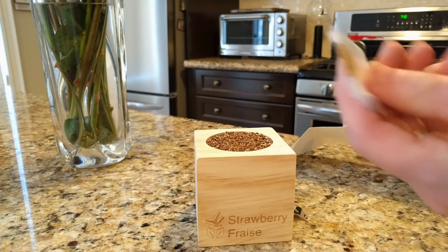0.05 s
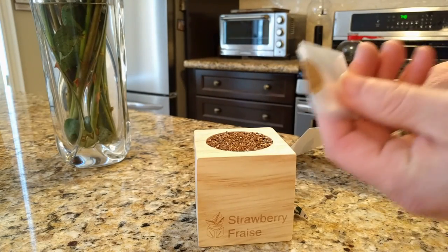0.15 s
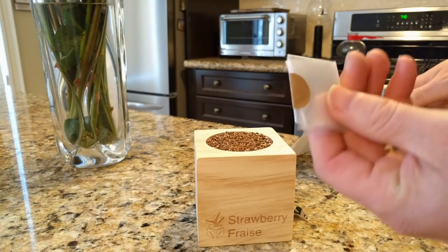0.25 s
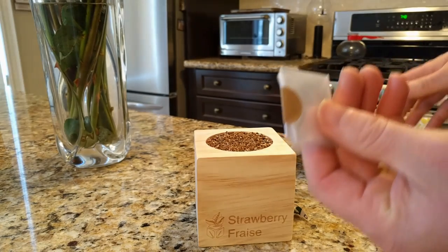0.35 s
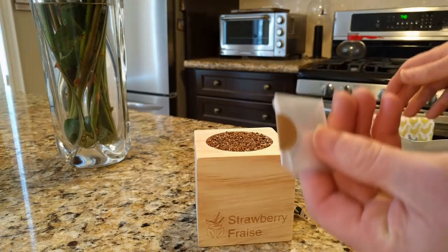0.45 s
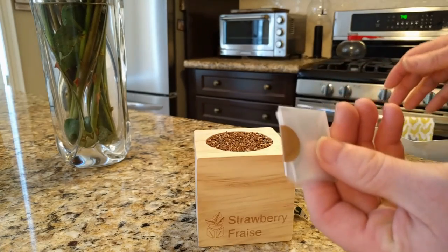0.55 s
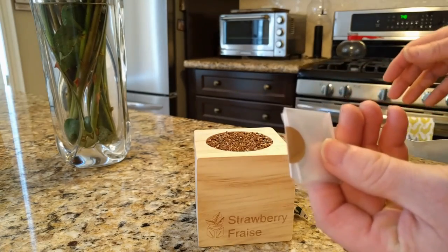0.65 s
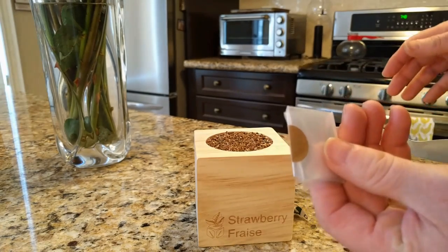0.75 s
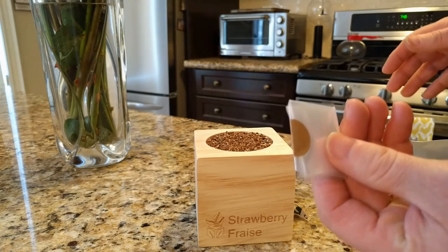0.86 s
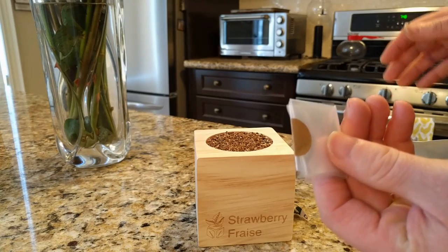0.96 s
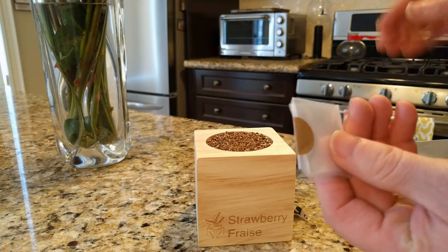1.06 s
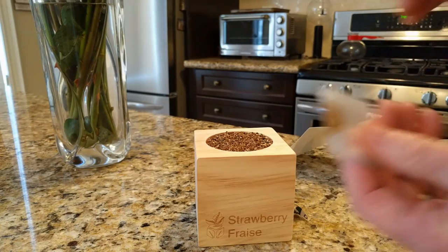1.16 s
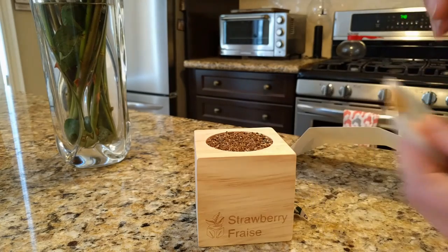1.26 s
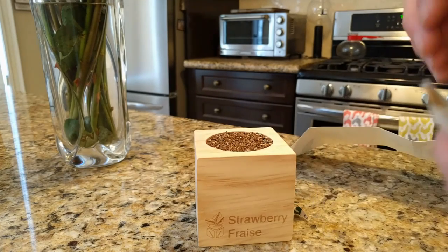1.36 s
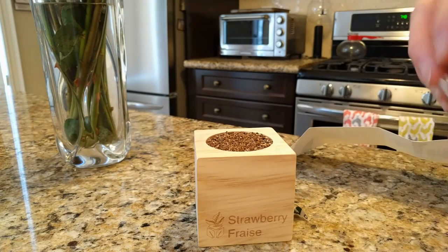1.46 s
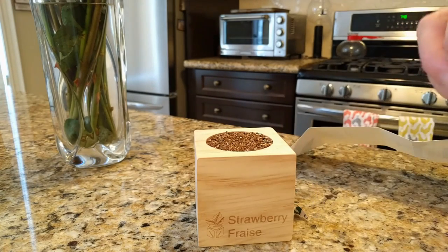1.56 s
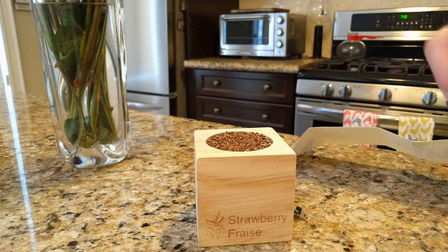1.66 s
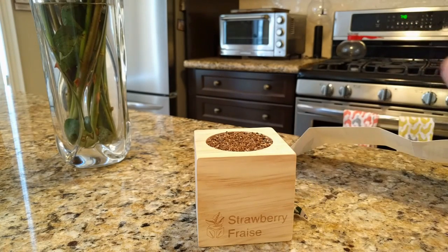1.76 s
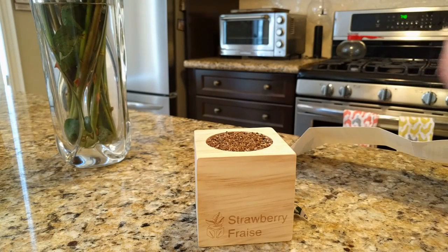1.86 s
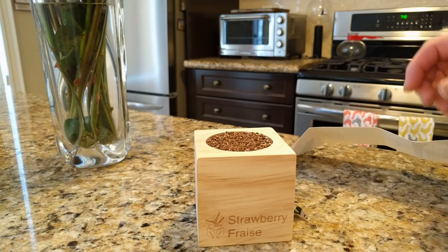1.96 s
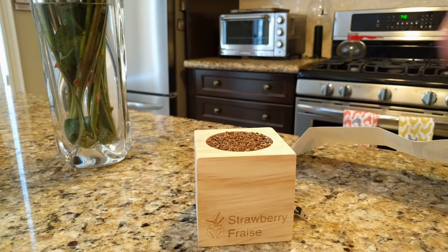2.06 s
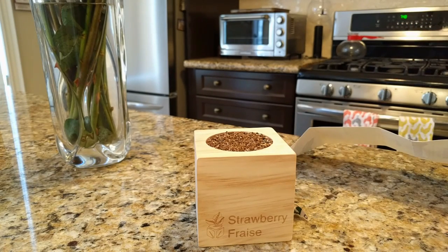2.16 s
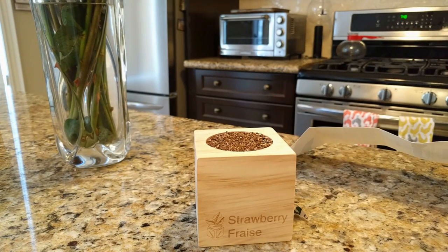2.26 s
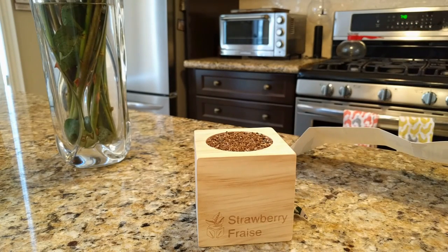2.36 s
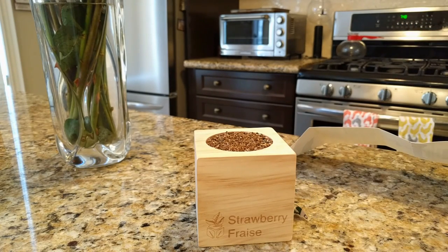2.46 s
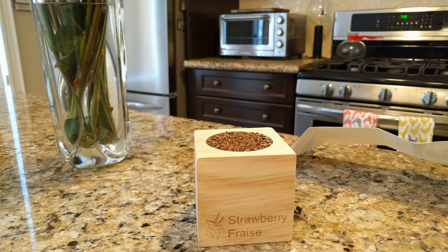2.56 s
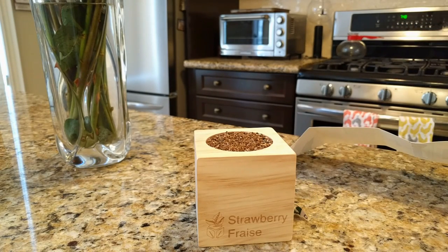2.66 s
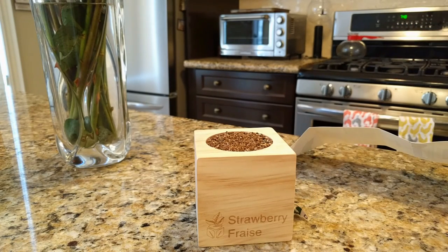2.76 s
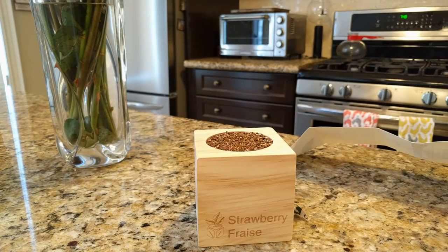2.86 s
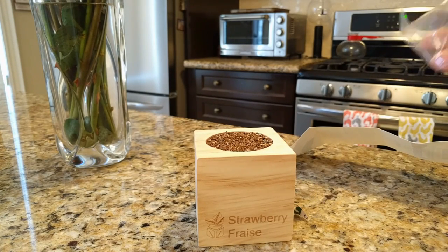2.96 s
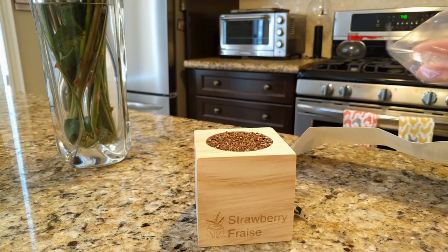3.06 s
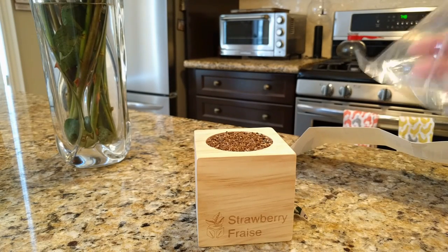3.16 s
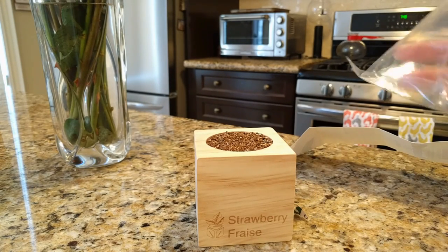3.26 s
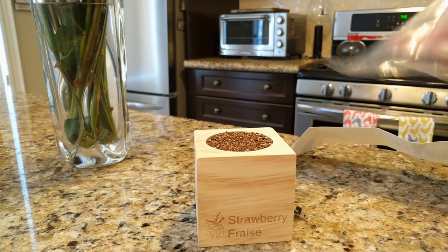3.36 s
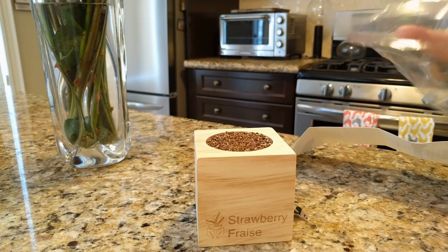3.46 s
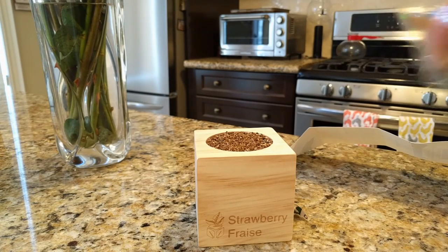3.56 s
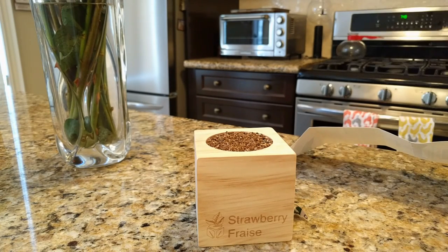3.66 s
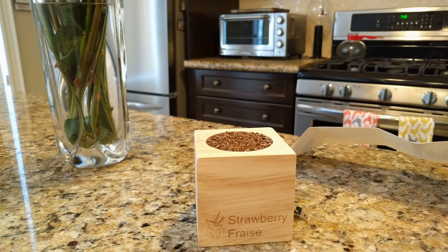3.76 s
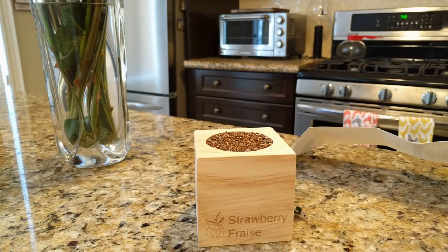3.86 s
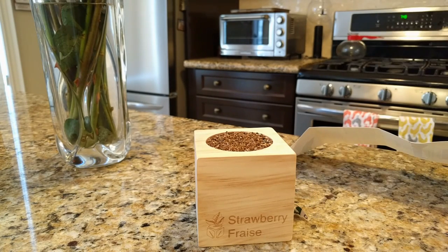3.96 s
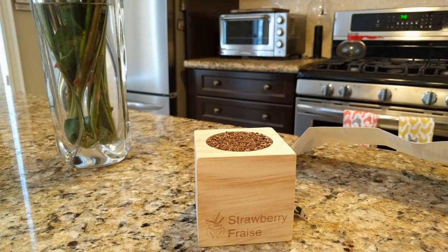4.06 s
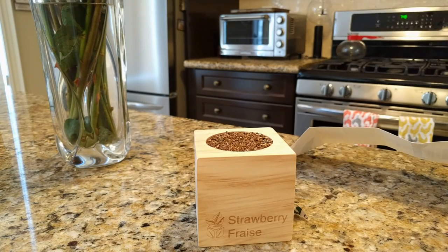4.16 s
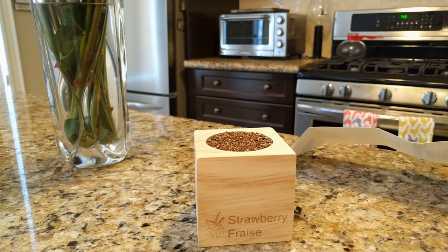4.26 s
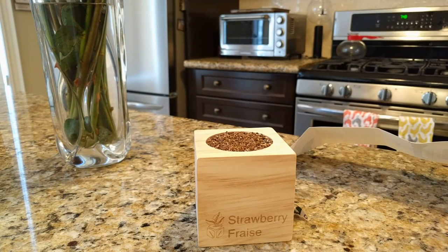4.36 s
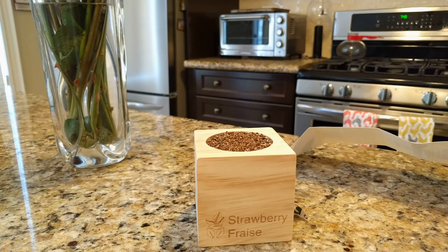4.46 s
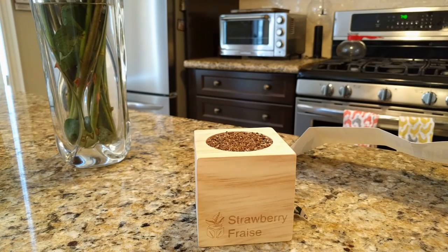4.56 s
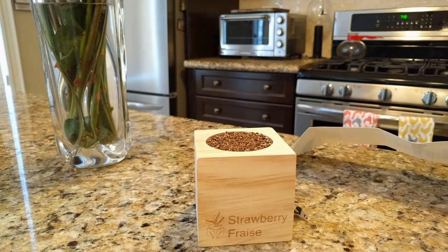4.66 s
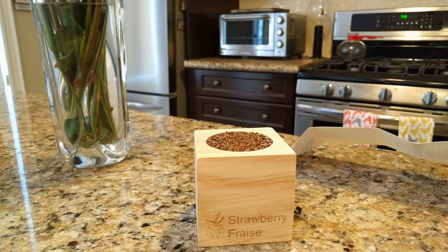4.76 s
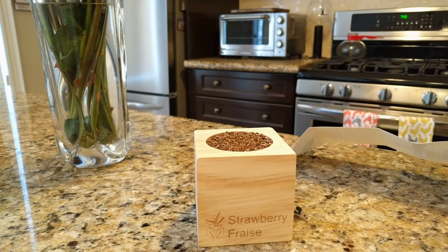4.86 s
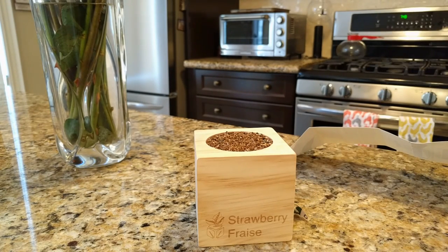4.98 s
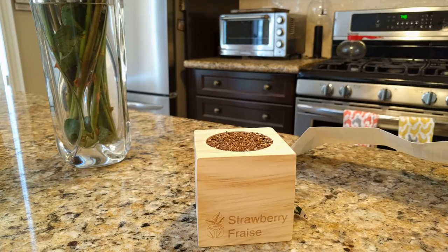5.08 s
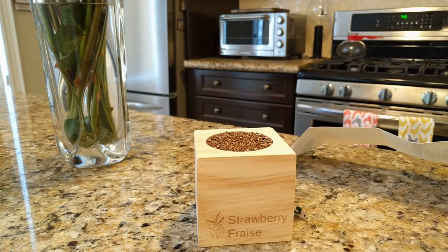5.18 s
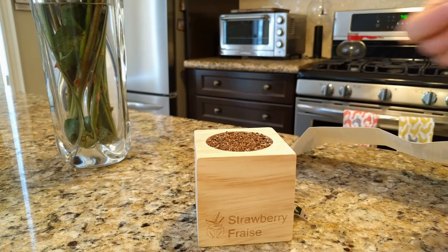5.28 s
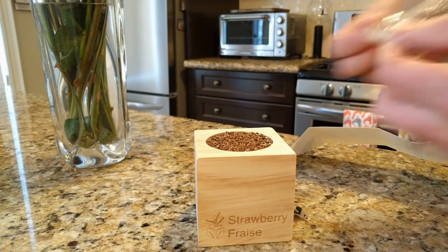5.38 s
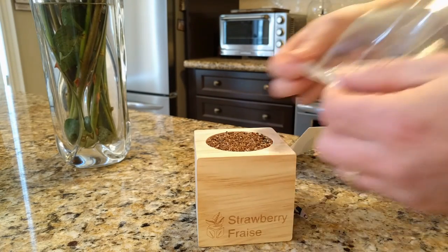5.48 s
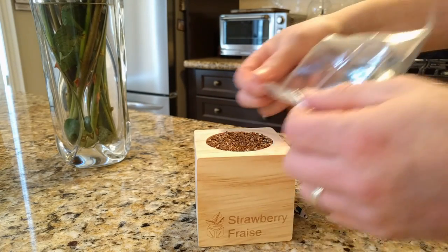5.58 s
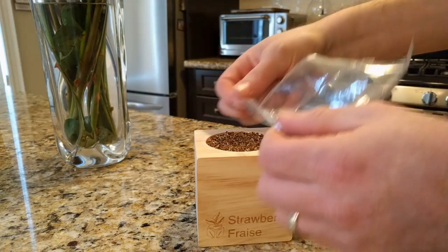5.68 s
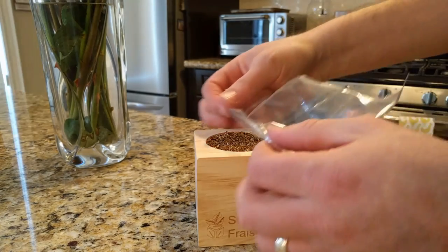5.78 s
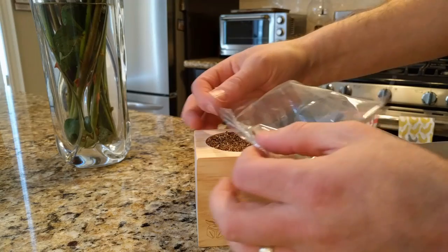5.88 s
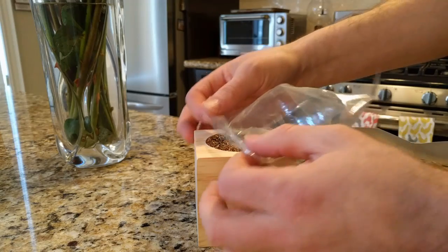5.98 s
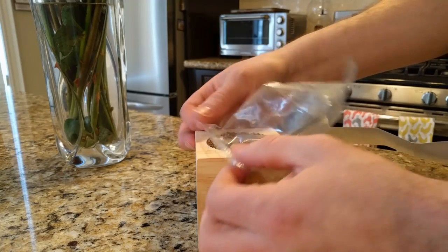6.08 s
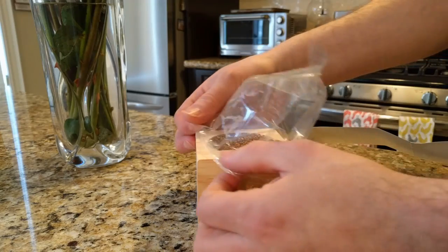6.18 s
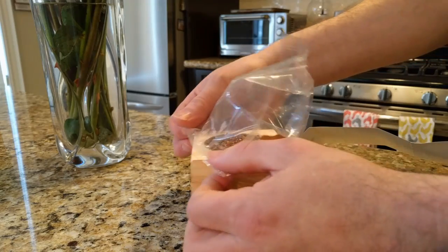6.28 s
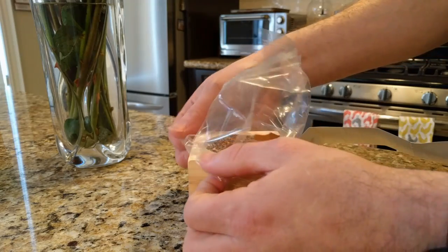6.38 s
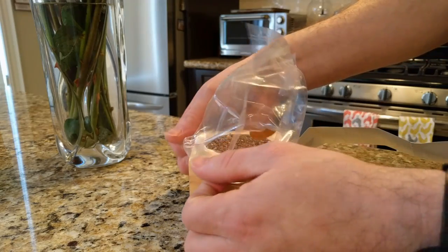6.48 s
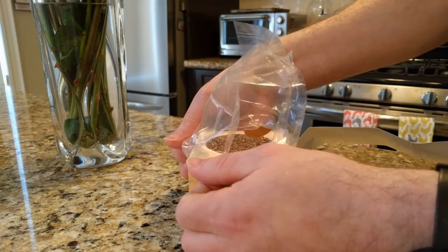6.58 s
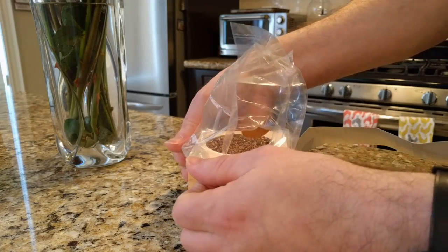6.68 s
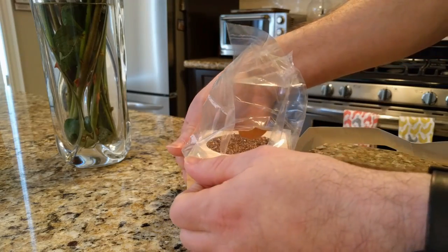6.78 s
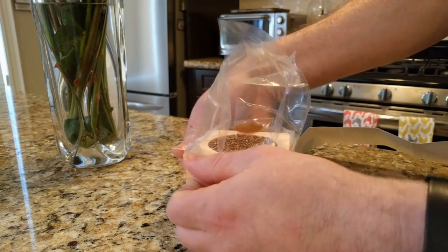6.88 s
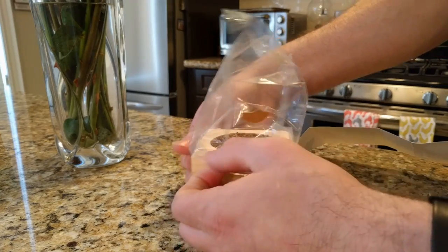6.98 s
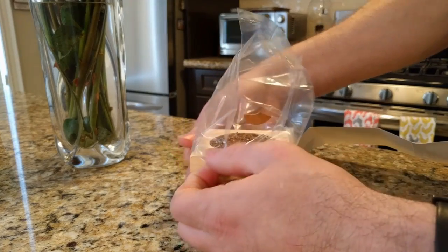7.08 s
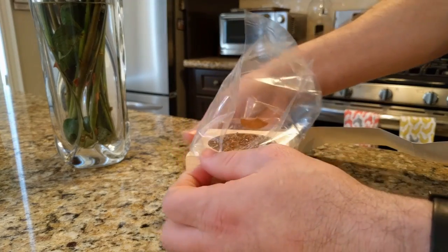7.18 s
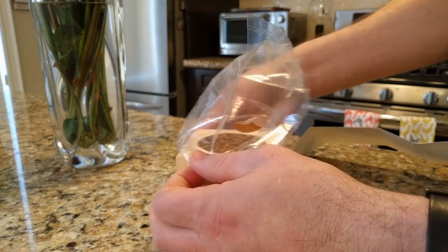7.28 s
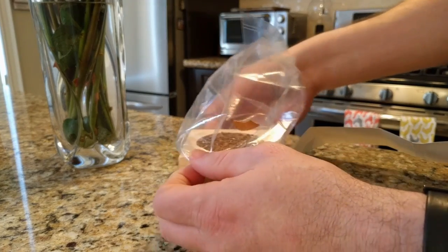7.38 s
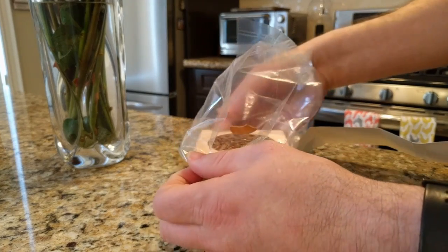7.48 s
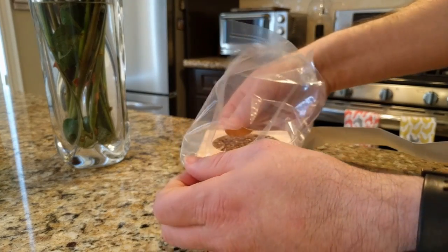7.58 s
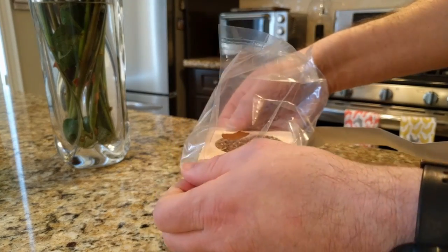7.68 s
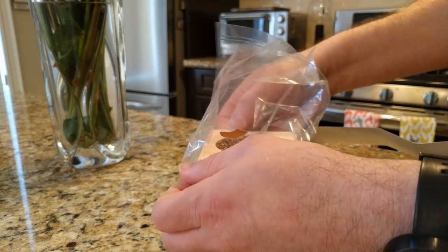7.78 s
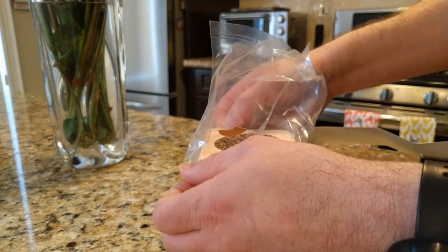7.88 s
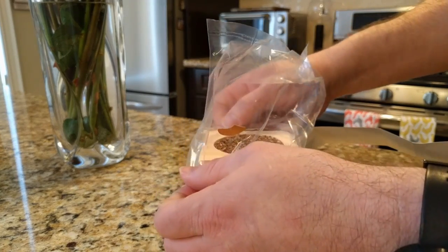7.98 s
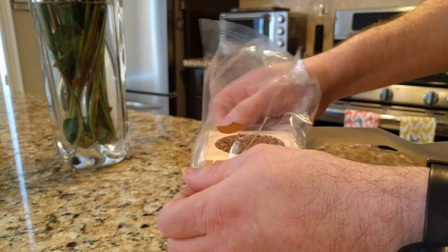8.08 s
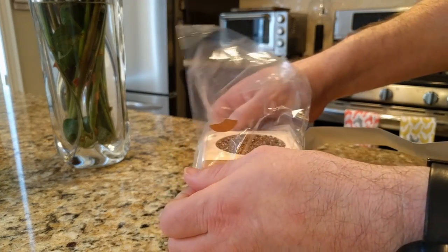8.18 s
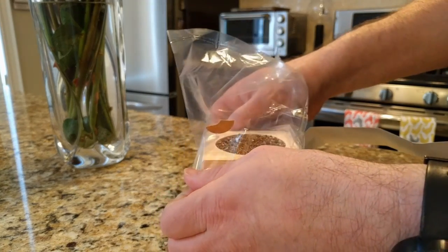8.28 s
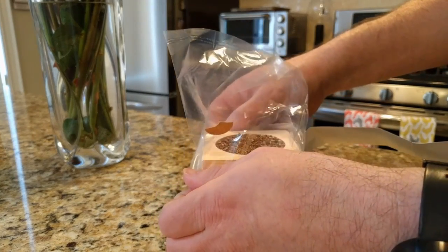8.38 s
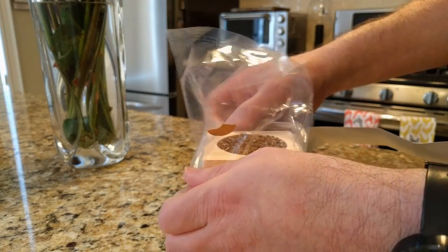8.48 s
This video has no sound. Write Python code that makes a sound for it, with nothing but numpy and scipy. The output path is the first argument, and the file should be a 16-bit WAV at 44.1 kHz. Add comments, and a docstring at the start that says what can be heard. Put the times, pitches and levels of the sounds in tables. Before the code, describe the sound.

A thin plastic bag is handled close up, following a near-silent start with only the slight rub of a small packet. The bag is loudest just after it is grabbed, then crackles, swishes and snaps irregularly as hands pull it open and work it down over a block, with soft puffs of air as it billows. The kitchen adds a short echo and a very low-level hum.

```python
"""Thin plastic bag in a quiet kitchen

A small packet rubs faintly in the hand, then a thin plastic bag is picked up, pulled open and drawn
over a wooden block. Creases buckle in sharp snaps over a crackle of tiny ones and the hiss of film
sliding on film; the sheet flutters softly as it bends. The room adds a short tail and a faint hum."""
import sys
import numpy as np
from scipy import signal
from scipy.fft import rfft, irfft, next_fast_len
from scipy.io import wavfile
from scipy.ndimage import uniform_filter1d

SR = 44100
rng = np.random.default_rng(int(sys.argv[2]) if len(sys.argv) > 2 else 0)


def transcribe(signal):
    """Save signal, clipped to [-1, 1], as a 16-bit WAV file at the path in sys.argv[1]."""
    frames = np.atleast_2d(signal).T
    limited = np.clip(frames, -1, 1)
    pcm = np.round(limited * 32767).astype(np.int16)
    wavfile.write(sys.argv[1], SR, pcm)


N = 376173
TIME = np.arange(N) / SR
PICKUP_S, GRIP_S = 2.2, 0.013  # when the bag is taken up, and how fast the grip closes
LEAD_S = 0.004  # run-up ahead of each click's peak
TOP_HZ = 15800  # upper edge of the sound


def amp(db):
    """Decibels to gain."""
    return 10 ** (np.asarray(db) / 20)


def unit(x):
    """Scales to rms 1."""
    return x / np.sqrt(np.mean(x ** 2) + 1e-20)


def read(points, hz):
    """Reads a table on a log-frequency axis."""
    f, value = np.transpose(points)
    return np.interp(np.log(hz + 1), np.log(f + 1), value)


def follow(rows):
    """Turns rows of (time, values...) into one automation curve per value."""
    s, *columns = np.transpose(rows)
    return [np.interp(TIME, s, c) for c in columns]


def fade_in(s, fade_s):
    """Ramps from 0 to 1, starting at time s."""
    return np.clip((TIME - s) / fade_s, 0, 1)


def add(mix, s, sound):
    """Mixes a sound in at time s."""
    part = mix[max(round(s * SR), 0):][:len(sound)]
    part += sound[:len(part)]


def noise(spectrum):
    """Steady noise of rms 1 with the given spectrum."""
    size = next_fast_len(N)
    gain = amp(read(spectrum, np.fft.rfftfreq(size, 1 / SR)))
    return unit(irfft(rfft(rng.standard_normal(size)) * gain, size)[:N])


def wander(per_s):
    """Random modulation of rms 1, gliding to a new value per_s times a second."""
    knots = rng.standard_normal(4096)
    return unit(np.interp(TIME * per_s, np.arange(len(knots)), knots))


def brighten(x, tilt_db, split_hz=5200):
    """Tilts the treble against everything below it."""
    lows = signal.sosfiltfilt(signal.butter(2, split_hz, fs=SR, output="sos"), x)
    return lows * amp(-tilt_db / 2) + (x - lows) * amp(tilt_db / 2)


def resonate(x, hz, width_hz):
    """A sweepable resonance, applied twice for steep sides."""
    carrier = np.exp(2j * np.pi * np.cumsum(hz * np.ones(len(x))) / SR)
    pole = np.exp(-np.pi * width_hz / SR)
    band = signal.lfilter([(1 - pole) ** 2], [1, -2 * pole, pole * pole], x / carrier + 1e-18)
    return 2 * (carrier * band).real


def room_tone(air_db=-64.5, hum_db=-75, hum_hz=193, drift_hz=6, throb_db=1.5, swell_s=0.06):
    """Still room air and the unsteady hum of an appliance."""
    # colour of the air: (frequency [Hz], relative level [dB])
    air_spectrum = [(20, -20), (40, -10), (70, -4), (130, -10), (250, -8), (330, -8.5), (420, -14.5),
                    (510, -10), (700, -16.5), (1100, -20.5), (2000, -24), (5000, -28), (15500, -28.5)]
    # brief swells of the hum: (peak time [s], level [dB])
    hum_swells = [(.43, -70), (1.37, -67), (1.92, -66)]
    swells = sum(amp(db) * np.exp(-((TIME - s) / swell_s) ** 2) for s, db in hum_swells)
    cycles = np.cumsum(hum_hz + drift_hz * wander(60)) / SR
    hum = unit(np.sin(2 * np.pi * cycles) * amp(throb_db * wander(10)))
    return amp(air_db) * noise(air_spectrum) + (amp(hum_db) + swells) * hum


def kitchen(x, wet_db=-16.0, onset_s=0.011):
    """Adds a few near reflections and a diffuse tail in which each band dies at its own speed."""
    # reverb decay: (frequency [Hz], time to fall 60 dB [s])
    decay_times = [(150, 0.43), (1000, 0.7), (3000, 0.24), (8000, 0.36), (16000, 0.44)]
    # early reflections off counter and hands: (delay [s], level [dB])
    reflections = [(.0031, -34.5), (0.0093, -22.5), (0.0192, -30.5)]
    hz, t, bands = signal.stft(rng.standard_normal(SR // 2), SR, nperseg=256)
    decay = amp(-60 * t / read(decay_times, hz)[:, None])
    tail = signal.istft(bands * decay, SR, nperseg=256)[1]
    tail *= np.minimum(np.arange(len(tail)) / SR / onset_s, 1) ** 2
    tail *= amp(wet_db) / np.linalg.norm(tail)
    for s, db in reflections:
        add(tail, s, amp([db]))
    return x + signal.fftconvolve(x, tail)[:N]


def handling(hold_db=-54.5, hold_bright_db=-4, curve=1.07, fidget_db=1.0, fidgets_per_s=40):
    """Effort and brightness curves [dB] of the hands: strokes swell and die over a steady hold."""
    # finger strokes on the packet, then on the bag:
    # (peak time [s], rise [s], release [s], effort [dB], brightness [dB])
    strokes = [(0.0, .05, .15, -60.5, -2), (.317, 0.14, .15, -66.5, 0), (1.5, .06, .06, -67, 0),
               (1.66, 0.11, 0.1, -63, 8), (1.82, 0.066, 0.059, -58.5, 3), (2.28, .02, 0.039, -33, 3.5),
               (2.4, .03, 0.12, -47, 8), (2.531, 0.053, 0.11, -35.5, 6.5), (2.64, 0.048, .07, -37.5, 7),
               (2.75, 0.049, 0.063, -30.5, 5), (2.904, 0.047, 0.082, -32.5, 6),
               (3.099, 0.042, 0.066, -36, 6.5), (3.165, .03, 0.042, -37.5, 9),
               (3.215, 0.03, 0.084, -37.5, 4), (3.372, 0.042, 0.032, -35.5, 6), (3.44, 0.018, 0.04, -42, 4),
               (3.554, 0.04, 0.058, -38.5, 3), (3.624, 0.051, 0.044, -37.5, -2),
               (3.78, .035, 0.031, -38.5, -0.5), (4.055, 0.029, 0.028, -49.5, 9),
               (4.133, 0.027, 0.023, -48, 11), (4.205, 0.031, 0.018, -48.5, 6),
               (4.395, 0.079, 0.24, -42, 2), (4.636, 0.014, .04, -49, 12), (4.73, 0.068, 0.08, -35.5, 0),
               (4.85, 0.12, 0.22, -39.5, 5), (5.02, .04, 0.069, -45, 2), (5.12, 0.088, .05, -41, 4),
               (5.25, 0.047, 0.057, -37, 2), (5.36, 0.056, 0.088, -46.5, 0), (5.52, 0.076, 0.067, -42, 3),
               (5.83, 0.018, 0.075, -43.5, 7), (6.1, 0.077, .05, -54.5, -5), (6.24, 0.078, .055, -45.5, 0),
               (6.412, 0.034, 0.036, -45.5, -7), (6.53, .04, .04, -55, -3), (6.8, 0.083, 0.032, -53, -3),
               (6.975, 0.042, 0.1, -47, -2), (7.114, 0.022, 0.035, -47, -7), (7.254, 0.022, .03, -50.5, 1),
               (7.348, 0.023, 0.056, -50, 0), (7.458, 0.02, 0.048, -42.5, 5), (7.575, 0.021, 0.16, -47, -2),
               (7.721, 0.018, 0.13, -39.5, 2.5), (7.98, 0.097, 0.061, -42, 1),
               (8.236, 0.021, .08, -47.5, 1), (8.433, 0.044, 0.052, -43, -4)]
    t = TIME[::64]  # control rate
    power = amp(hold_db) ** 2 * fade_in(PICKUP_S, GRIP_S)[::64] + 1e-14
    weighted_bright = power * hold_bright_db
    for s, rise_s, release_s, db, bright_db in strokes:
        from_peak = abs(t - s) / np.where(t < s, rise_s, release_s)
        stroke_power = (amp(db) * np.exp(-from_peak ** curve)) ** 2
        power += stroke_power
        weighted_bright += stroke_power * bright_db
    effort_db = np.interp(TIME, t, 10 * np.log10(power)) + fidget_db * wander(fidgets_per_s)
    return effort_db, np.interp(TIME, t, weighted_bright / power)


def whistle(trim_db=-3, waver=0.005, fade_s=0.02):
    """A faint, very high, wavering thread of tone as the bag is stretched."""
    # the whistle's path: (time [s], pitch [Hz], level before trim [dB])
    path = [(7.98, 13950, -72), (8.02, 13720, -66), (8.06, 13630, -61), (8.15, 14000, -59),
            (8.2, 13830, -69), (8.3, 13930, -66), (8.38, 13350, -68), (8.46, 12950, -66.5),
            (8.53, 12300, -63)]
    hz, db = follow(path)
    cycles = np.cumsum(hz * (1 + waver * wander(300))) / SR
    return unit(np.sin(2 * np.pi * cycles)) * amp(db + trim_db) * fade_in(path[0][0], fade_s)


def billows(trim_db=-2.5, length_s=0.06):
    """Short, soft puffs of air as the slack bag billows or a hand bumps it."""
    # the puffs: (peak time [s], level before trim [dB])
    puffs = [(2.273, -54.5), (2.323, -52), (2.525, -53), (2.765, -49), (3.012, -53.5), (3.201, -50),
             (3.382, -50), (3.545, -47), (3.62, -49), (3.659, -55), (4.71, -52), (6.96, -57), (7.115, -56),
             (7.622, -52)]
    # their bassy colour: (frequency [Hz], relative level [dB])
    puff_spectrum = [(20, -22), (45, -3.5), (70, -1), (110, -5), (200, -6.5), (400, -13), (800, -13),
                     (2000, -58)]
    air, out = noise(puff_spectrum), np.zeros(N)
    swell = signal.windows.hann(round(length_s * SR))
    for s, db in puffs:
        puff = air[round(s * SR):][:len(swell)] * swell
        add(out, s - length_s / 2, amp(db + trim_db) * unit(puff))
    return out


def flutter(effort_db, level_db=-56.5, effort_slope=0.48, flap_db=3.0, flaps_per_s=60):
    """The bending sheet pushes air in soft, uneven flaps: more with effort, more when it is slack."""
    # soft body of the flaps: (frequency [Hz], relative level [dB])
    flap_spectrum = [(25, -15), (45, -1), (68, 2), (110, -0.5), (200, 2), (300, -1.5), (500, 1), (800, -6),
                     (1200, -5.5), (2500, -33)]
    # how slack the sheet hangs, so how much air it moves: (time [s], gain [dB])
    slack = [(2.3, -0.5), (2.7, 3.5), (3.4, 0.5), (4.1, -0.5), (4.9, -1), (5.25, 2), (5.7, -2), (6.3, 1),
             (7.3, 4), (8.0, 1.5), (8.5, 0.5)]
    slack_db, = follow(slack)
    flex_db = level_db + effort_slope * (effort_db + 43) + slack_db
    flaps = unit(noise(flap_spectrum) * amp(flap_db * wander(flaps_per_s)))
    return flaps * amp(flex_db) * fade_in(PICKUP_S, GRIP_S)


def hollow(effort_db, trim_db=-1.5, width_hz=1200, low_cut_hz=1500, shift=0.13, shifts_per_s=35,
           pump_db=4, fade_s=0.053):
    """The air pocket in the loose bag resonates, and its pitch shifts as the walls move."""
    # the air pocket: (time [s], resonance [Hz], level against the effort, before trim [dB])
    pocket = [(2.25, 2700, -6), (2.75, 2080, -3.5), (3.05, 2600, -5.5), (3.6, 2470, -2.5), (3.8, 2200, -11),
              (4.8, 2210, -15.5), (5.1, 1950, -5), (5.6, 2200, -9.5)]
    hz, db = follow(pocket)
    ring = resonate(rng.standard_normal(N), hz * np.exp(shift * wander(shifts_per_s)), width_hz)
    ring = signal.sosfilt(signal.butter(6, low_cut_hz, "high", fs=SR, output="sos"), ring)
    ring = unit(ring * amp(pump_db * wander(160)))
    gate = np.clip(np.minimum(TIME - pocket[0][0], pocket[-1][0] - TIME) / fade_s, 0, 1)
    return ring * amp(effort_db + db + trim_db) * gate


def swishes():
    """A sliding stroke rubs one patch of film or packet; its resonance glides as it changes size. The last,
    very short and bright row is instead a burst of several creases giving way at once."""
    # (peak time [s], length [s], level [dB], centre [Hz], glide [octaves], width [Hz])
    rubs = [(0.321, 0.15, -76, 1950, 0, 600), (1.57, 0.027, -69.5, 3180, -0.14, 680),
            (1.718, .22, -77, 3060, -0.061, 600), (2.57, .09, -48.5, 2000, -0.095, 700),
            (2.769, 0.17, -53, 1940, 0.15, 800), (3.012, .08, -46, 2420, 0.25, 700),
            (3.378, 0.042, -46, 2650, 0.15, 900), (3.62, 0.083, -48, 2330, -0.04, 900),
            (3.772, 0.084, -50, 1800, 0.037, 700), (4.851, .09, -49, 3520, 0.34, 1500),
            (5.876, .085, -50, 3700, -0.45, 1100), (6.41, 0.073, -54, 2760, 0, 1500),
            (7.718, .016, -37.5, 9500, 0, 5000)]
    out = np.zeros(N)
    for s, length_s, db, hz, glide, width_hz in rubs:
        travel = np.linspace(-0.5, 0.5, round(length_s * SR))
        rub = resonate(rng.standard_normal(len(travel)), hz * 2 ** (glide * travel), width_hz)
        add(out, s - length_s / 2, amp(db) * unit(rub * np.cos(np.pi * travel)))
    return out


def slide(effort_db, bright_db, trim_db=-4.5, catch_db=3.0, catches_per_s=260):
    """Film rubs on film and skin: a hiss that catches and lets go."""
    # colour of the friction: (frequency [Hz], relative level [dB])
    hiss_spectrum = [(100, -26), (500, -10), (850, -6), (1150, -5), (1450, 5), (1900, 2), (2800, 5.5),
                     (3800, 2.5), (5500, 4), (9000, 0), (16000, -2)]
    hiss = unit(noise(hiss_spectrum) * amp(catch_db * wander(catches_per_s)))
    return brighten(hiss, bright_db) * amp(effort_db + trim_db)


def buckle(spectrum, decay_s, rattle, yield_s, size=1024):
    """One click of energy 1: a facet of film yields, flips, and waves scatter between the creases."""
    flip = round(LEAD_S * SR)
    t = (np.arange(size) - flip) / SR
    scatter = rng.standard_normal(size) * np.exp(-abs(t) / np.where(t < 0, yield_s, decay_s))
    pulse = rattle * scatter / np.linalg.norm(scatter)
    pulse[flip] += rng.choice([-1, 1])
    log_gain = np.log(amp(read(spectrum, abs(np.fft.fftfreq(size, 1 / SR)))))
    response = np.exp(np.conj(signal.hilbert(log_gain)))  # minimum phase: rings only once moved
    click = np.fft.ifft(np.fft.fft(pulse) * response).real
    return click / np.linalg.norm(click)


def crackle(effort_db, bright_db, trim_db=-3.0, per_s=600, crowding=0.64, spread_db=7.0,
            colour_db=6.5, gentle_db=-52, facets=32):
    """Tiny creases of many colours; working the film harder makes them both denser and louder."""
    # average colour of a tiny crease: (frequency [Hz], relative level [dB])
    crease_spectrum = [(100, -26), (500, -13), (850, -7), (1150, -18), (1450, -3), (1800, -1.5),
                       (2400, -0.5), (3600, 0.5), (5000, 1), (8000, -2.5), (12000, -4), (16000, -6)]
    chance = per_s * amp(crowding * (effort_db + 42.5)) / SR
    sizes = amp(spread_db * np.minimum(rng.exponential(1, N), 2.6))
    hits = sizes * (rng.random(N) < chance)
    # the hands feed in energy steadily, and the creases share it out
    hits /= np.sqrt(np.maximum(uniform_filter1d(hits ** 2, size=1800), 0) + 0.5 * chance)
    # under a gentle touch the film mostly slides and hardly buckles
    hits *= amp(effort_db + trim_db) / np.hypot(1, amp(gentle_db - effort_db))
    facet, out = rng.integers(0, facets, N), np.zeros(N)
    for k in range(facets):
        spectrum = [(hz, db + colour_db * rng.standard_normal()) for hz, db in crease_spectrum]
        click = buckle(spectrum, decay_s=0.0016, rattle=1.85, yield_s=0.00044)
        out += signal.oaconvolve(hits * (facet == k), click)[:N]
    return brighten(out, bright_db)


def snap(db, hz, bass_db, treble_db, rattle=1.92, yield_s=0.00008, neighbour_db=-18, chain_s=0.003):
    """One crease rings around its own pitch and tips a small neighbour over just after."""
    spectrum = [(30, bass_db - 12), (250, bass_db - 3.5), (hz / 1.9, bass_db),
                (hz, 0), (TOP_HZ, treble_db)]
    ring_s = 0.0016 * (3500 / hz) ** 0.35  # large, low facets ring longer
    click = buckle(spectrum, ring_s, rattle, yield_s)
    add(click, chain_s * rng.random(), amp(neighbour_db) * buckle(spectrum, ring_s, rattle, yield_s))
    return amp(db) * np.sqrt(0.0041 * SR) * click  # the energy of 4.1 ms at this level


def small_snaps(effort_db, level_db=-42, effort_slope=0.95, spread_db=4, low_hz=1500, high_hz=5500,
                bass_db=-13, treble_db=-9, colour_db=7, count=160):
    """Lesser creases give way at random while the bag is held, louder when it is worked harder."""
    out = np.zeros(N)
    slot_s = (N / SR - PICKUP_S) / count
    for k, (when, size, pitch, colour) in enumerate(rng.random((count, 4))):
        s = PICKUP_S + (k + when) * slot_s
        push_db = effort_slope * (np.interp(s, TIME, effort_db) + 44)
        db = level_db + push_db + spread_db * (2 * size - 1)
        hz = low_hz * (high_hz / low_hz) ** pitch
        add(out, s - LEAD_S, snap(db, hz, bass_db, treble_db + colour_db * (2 * colour - 1)))
    return out


def big_snaps():
    """The large creases buckle one by one: the sharp accents on top of the rustle."""
    # (time [s], level [dB], ring [Hz], bass against the ring [dB], treble against the ring [dB])
    creases = [(1.494, -63, 3000, -15, -10), (1.6428, -49.5, 7200, -16, -14), (1.6844, -43, 4300, -18, 2),
               (1.814, -50.5, 2900, -21, -20), (1.8272, -47, 1500, -17, -11), (2.2753, -32, 5530, -17, -21),
               (2.328, -42, 2500, -4, -2), (2.4252, -32.5, 2500, -16, -13), (2.52, -27, 4600, -7.5, 1),
               (2.558, -27.5, 2100, -15, 2), (2.5946, -24, 10000, -9, 0), (2.651, -30, 3500, -9, 2),
               (2.677, -21.5, 3100, -8, 2.5), (2.7338, -23, 1900, -7, 12), (2.777, -27.5, 6300, -6, 4),
               (2.795, -29, 9400, -16, 2), (2.8292, -33.5, 3700, -15, -5), (2.8433, -36, 7200, -9, -3),
               (2.8717, -28.5, 2500, -19, 0), (2.877, -27.5, 3980, -25, -13), (2.937, -26, 2100, -13, 4),
               (2.9714, -34, 3300, -11, -16), (2.9994, -32.5, 2500, -17, -30),
               (3.0141, -30.5, 2500, -12, -8), (3.0604, -29, 2100, -22, -13), (3.1706, -30.5, 3300, -15, 3),
               (3.2115, -27, 2450, -15, -14), (3.2205, -31.5, 1810, -20, -10),
               (3.2274, -25.5, 2400, -10, -1), (3.246, -31.5, 3100, -30, -9), (3.2635, -38, 9400, -12, -20),
               (3.2771, -34, 9400, -13, -3), (3.3295, -32, 2500, -9, -4), (3.3727, -29, 2500, -15, -8),
               (3.429, -32, 2900, -20, 3), (3.4404, -27, 1710, -14, -2), (3.5582, -29, 2900, -15, -15),
               (3.5633, -26, 2700, -14, -7), (3.5738, -30, 2450, -18, -18), (3.6451, -31, 2200, -14, -10),
               (3.7062, -39.5, 1800, -16, -15), (3.7516, -31, 1500, -29, -11),
               (3.7766, -32.5, 2380, -4.5, -24), (3.8025, -35, 2900, -17, 6), (3.872, -32.5, 3700, -10, -9),
               (3.9534, -44, 1800, -13, -22), (4.0396, -41.5, 1900, -11, -12), (4.062, -43, 2100, -17, -7),
               (4.1361, -38, 2430, -33, -15), (4.1765, -37, 1700, -21, 1), (4.3027, -35, 4600, -6, 10),
               (4.422, -28.5, 2200, -16, 20), (4.458, -30, 3700, -22, -12), (4.4756, -39, 6300, -18, -18),
               (4.519, -40, 2700, -9, -20), (4.5888, -29.5, 2200, -10, 13), (4.5996, -33.5, 2400, -22, 9),
               (4.616, -41, 2400, -22, -2), (4.6361, -35.5, 2500, -22, -10), (4.656, -28.5, 3500, -28, 4),
               (4.6843, -34, 1800, -15, -5), (4.7454, -33, 2200, -14, -5), (4.8052, -29, 1800, -15, 2),
               (4.8172, -25.5, 3500, -18, -7), (4.876, -35, 4300, -26, -6), (4.904, -31, 7700, -31, -3),
               (4.942, -31.5, 2730, -19, -21), (5.0454, -28, 5900, -4, -2), (5.116, -31.5, 3100, -21, 6),
               (5.1032, -36.5, 1810, -15, -23), (5.1473, -32.5, 1900, -17, -6),
               (5.1814, -33, 2700, -22, -2), (5.1972, -31.5, 3500, -8, -8), (5.246, -33, 6800, -19, -7),
               (5.2555, -29.5, 2900, -4, -1), (5.2668, -29, 1700, -1, -3), (5.3479, -36.5, 2500, -20, -19),
               (5.4125, -36, 3700, -8, -2), (5.426, -32, 2730, -5, -2), (5.4499, -26, 2940, -11, -5),
               (5.4703, -36, 2220, -12, -32), (5.505, -33, 3500, -11, -12), (5.5214, -36, 4300, -19, -8),
               (5.5416, -38, 3270, -24, -24), (5.5475, -27.5, 8200, -16, 7), (5.573, -30.5, 1500, -9, 1),
               (5.6562, -40.5, 6770, -10, -10), (5.691, -45, 1900, -16, -21),
               (5.811, -43.5, 5200, -11, -19), (5.8803, -39, 3720, -5, -20), (5.9659, -34, 1640, -13, -7),
               (6.0456, -46, 1500, -24, -9), (6.0807, -44, 6800, -9, -14), (6.183, -35, 4470, -10.5, -19),
               (6.1982, -36.5, 5200, -17, -19), (6.2235, -35.5, 2500, -15, -6),
               (6.2445, -36.5, 2200, -12, 0), (6.264, -30.5, 3470, -10, -13),
               (6.2762, -31.5, 2900, -9, -18), (6.2963, -37, 4000, -0.5, -13), (6.48, -41, 1800, -17, -12),
               (6.527, -36.5, 3100, -3, -10), (6.5623, -38.5, 10000, 4, 7), (6.5837, -39.5, 2200, -7, -5),
               (6.6097, -33, 2400, -10, -19), (6.6432, -36, 1500, -11, -3), (6.689, -36, 1490, -14, -6),
               (6.7061, -38, 1700, -8, -18), (6.721, -36, 1500, 0, -8), (6.773, -32.5, 4600, 0.5, -6),
               (6.8036, -42, 6300, -3, -23), (6.8086, -32, 5640, -7.5, -9), (6.9391, -35.5, 5370, -6, -18),
               (6.9883, -40, 2100, -19, 5), (7.057, -34.5, 3300, -7, -13), (7.0767, -38, 2400, -12, -11),
               (7.1053, -27, 3500, -10, -21), (7.1148, -43, 1500, -4, -19), (7.1888, -41.5, 2500, -4, -9),
               (7.2538, -48, 10000, -9, -9), (7.3259, -45, 5200, -2, -23), (7.3408, -30.5, 4200, -14, -20),
               (7.4001, -49, 8200, -4, 4), (7.4394, -34, 10000, -11, -3), (7.4556, -42, 1700, -12, -1),
               (7.5437, -35, 3470, -7.5, -22), (7.5715, -40, 2700, -9, -41), (7.5876, -35, 2500, -1, -19),
               (7.5959, -28.5, 10000, 1.5, 1.5), (7.673, -29.5, 1900, -11, -15),
               (7.699, -31, 3700, -22, -9), (7.7146, -26.5, 5600, -20, -3), (7.7793, -28.5, 3700, 1, 4),
               (7.7838, -30, 2500, -8.5, -16), (7.8088, -37, 2500, 4, -13), (7.839, -34.5, 1490, 6, -14),
               (7.8879, -27.5, 3100, -17, 13), (7.9071, -31.5, 4430, -0.5, -34),
               (7.9287, -33, 5200, -3, -13), (7.9499, -30.5, 5300, -4, -33), (7.9672, -32, 2900, -12, 16),
               (8.0095, -39, 1500, -4, -4), (8.102, -38.5, 2630, -17, -33), (8.1345, -37, 2200, -6, -3),
               (8.2004, -35, 1700, -11, -1), (8.2254, -30, 5930, -12, -12), (8.2386, -38, 3320, -8.5, -27),
               (8.301, -36.5, 2540, -8.5, -18), (8.3217, -43, 1800, -8, 2), (8.418, -34.5, 2730, -15, -20),
               (8.4233, -30, 4030, -7, -13), (8.452, -38, 3300, -9, -21), (8.5267, -32.5, 4200, -23, -25)]
    out = np.zeros(N)
    for s, db, hz, bass_db, treble_db in creases:
        add(out, s - LEAD_S, snap(db, hz, bass_db, treble_db))
    return out


def scene():
    """The bag close up in the kitchen: a rustle that rides the hands' effort, plus placed accents."""
    effort_db, bright_db = handling()
    creases = big_snaps() + small_snaps(effort_db) + crackle(effort_db, bright_db)
    rubbing = slide(effort_db, bright_db) + hollow(effort_db) + swishes() + whistle()
    bag = creases + rubbing + flutter(effort_db) + billows()
    return (kitchen(bag) + room_tone())[None]


def record(dry, low_cut_hz=40):
    """Rolls off the deep bass and cuts the very top steeply."""
    thinned = signal.sosfilt(signal.butter(3, low_cut_hz, "high", fs=SR, output="sos"), dry)
    high_cut = signal.firwin(511, TOP_HZ, window=("kaiser", 9), fs=SR)
    return signal.oaconvolve(thinned, high_cut[None], "same")


dry = scene()
out = record(dry)
transcribe(out)
```